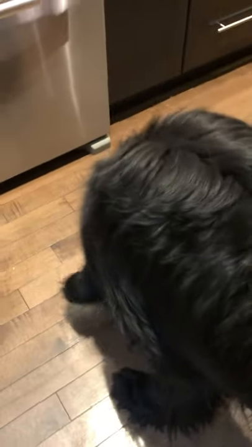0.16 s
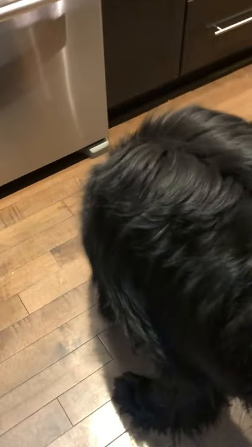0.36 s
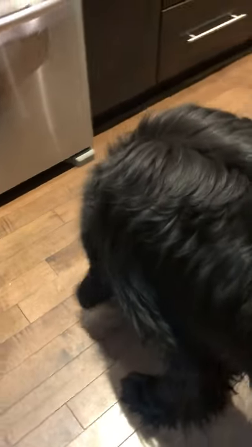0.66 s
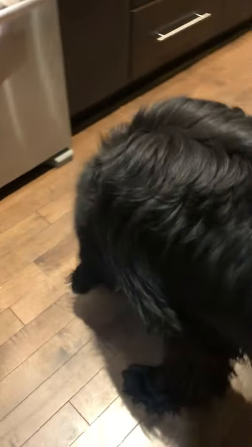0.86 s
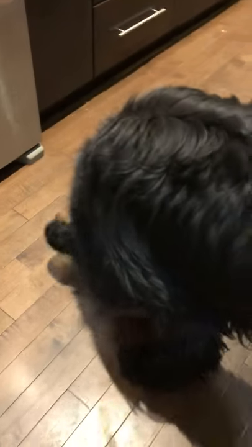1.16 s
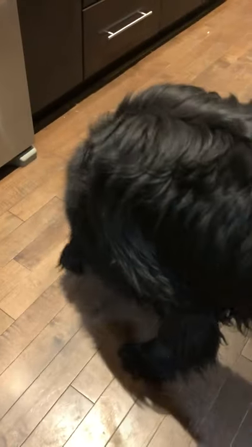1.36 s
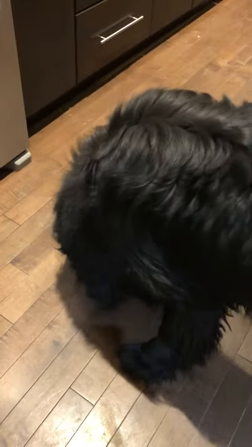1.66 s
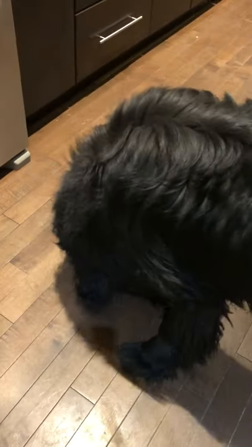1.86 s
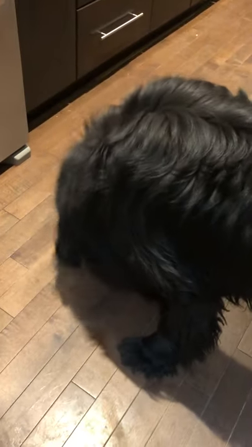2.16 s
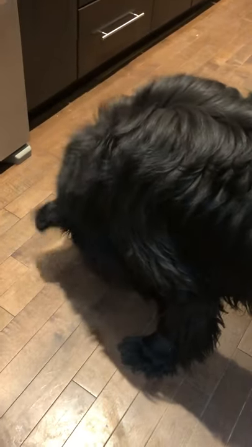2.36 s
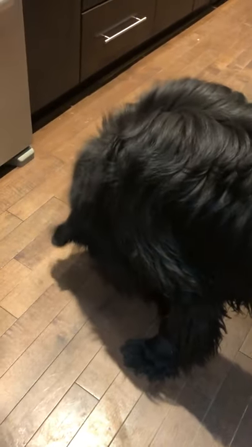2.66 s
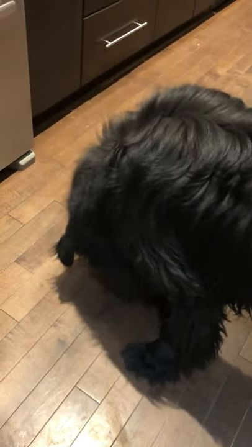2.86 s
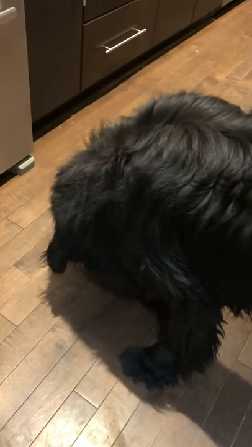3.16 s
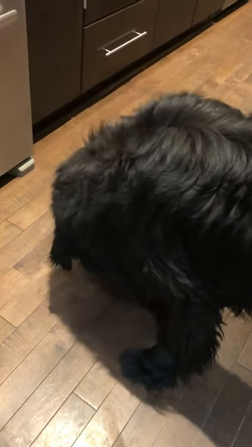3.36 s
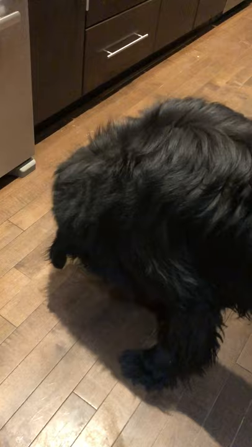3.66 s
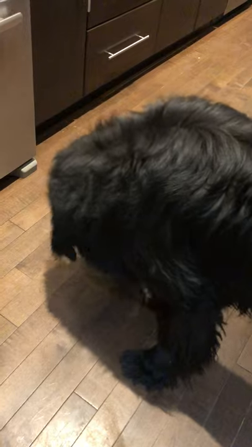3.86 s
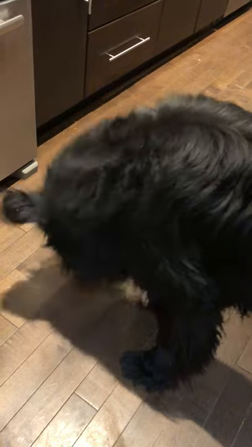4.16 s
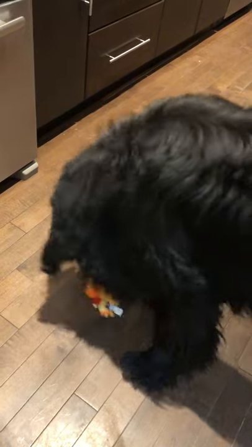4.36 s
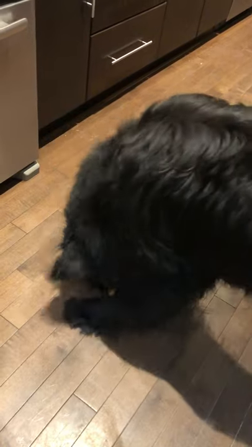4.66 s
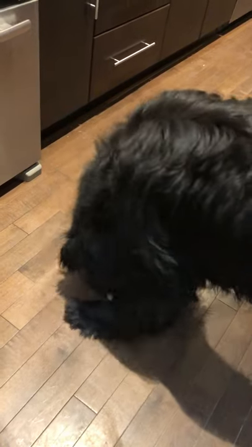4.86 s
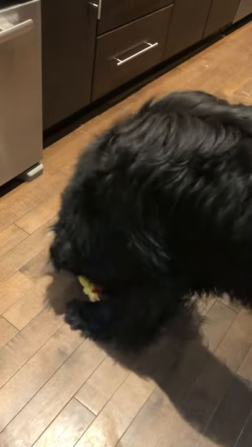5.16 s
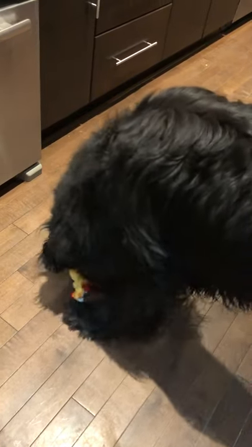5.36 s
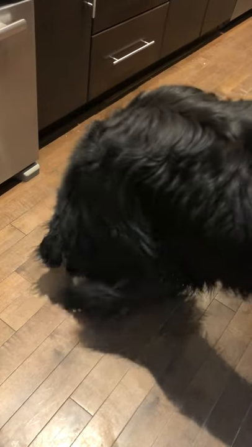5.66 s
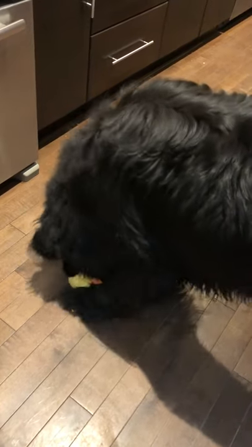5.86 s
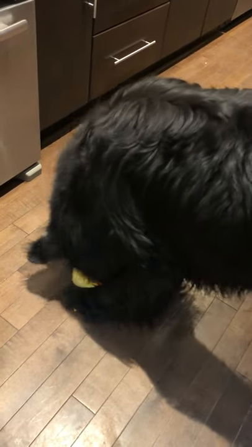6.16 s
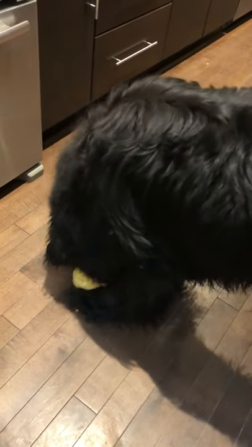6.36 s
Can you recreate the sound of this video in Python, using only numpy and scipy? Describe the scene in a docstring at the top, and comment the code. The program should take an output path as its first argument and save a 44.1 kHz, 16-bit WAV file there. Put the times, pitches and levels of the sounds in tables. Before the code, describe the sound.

A rubber toy squeaks with each bite and release as a dog mouths it and knocks it against a wooden kitchen floor.

```python
"""A hard, ringing kitchen with a wooden floor; a phone microphone near a large dog with a rubber toy.
Over the refrigerator's hum, paws thud and slide and the jaws smack. In the first seconds two bites
push air through the toy's reed, which sings again each time the jaws let go. Around four seconds
the toy knocks on the boards. Just after five comes a longer third bite with a hoarse, overblown
release, then a few last clacks and smacks."""
import sys
import numpy as np
from scipy import signal
from scipy.fft import rfft, irfft, next_fast_len
from scipy.io import wavfile
from scipy.ndimage import map_coordinates

SR = 44100
rng = np.random.default_rng(int(sys.argv[2]) if len(sys.argv) > 2 else 0)


def to_wav(sig):
    """Store sig (one row per channel, or 1-D mono) as 16-bit WAV at the path in sys.argv[1].

    Samples outside -1..1 are clipped; the rate is SR.
    """
    pcm = np.clip(np.atleast_2d(sig), -1, 1) * 32767
    pcm = np.round(pcm).astype(np.int16)
    wavfile.write(sys.argv[1], SR, pcm.T)  # frames by channels


N = 286633

# the kitchen's reverberation time: freq_hz, t60_s
ROOM_T60 = [(100, 0.12), (500, 0.97), (1400, 0.78), (5500, 0.64), (8000, 0.32), (15000, .28)]
# spectra of the reverberation, the steady room noise and the refrigerator's whine: freq_hz, gain_db
REVERB_TONE = [(100, 7.5), (600, 3.5), (1400, -2), (3000, 1), (6000, -2.5), (9000, 1), (15000, -0.5)]
RUMBLE_TONE = [(15, -48.5), (25, -26), (47, -2), (206, -3), (354, -11), (384, -13.5), (439, -8), (503, -12),
               (659, -14.5), (775, -17.5), (1130, -20), (2280, -28.5), (3250, -35), (3820, -32.5),
               (16000, -46)]
WHINE_TONE = [(2800, -45), (3130, -6), (3250, -7), (3370, -16), (3800, -44.5)]
# the refrigerator's hum: pitch_hz, level_db
FRIDGE_HUM = [(145.3, -69.5), (446.8, -69)]
# fur and rubber on the boards: start_s, attack_s, hold_s, level_db, tilt_db_per_octave, grain_db
SLIDES = [(0.0, .01, 0.045, -62, -3, 0.7), (.21, 0.0827, 0.014, -60.5, -0.5, 1.7),
          (.434, .008, 0.23, -58.5, -1.5, 1.9), (1.17, .07, 0.14, -58.5, 1, -0.4),
          (1.33, .08, .12, -53.5, 0.5, 1.25), (1.65, .02, 0.3, -64, -5, 2.5),
          (4.073, 0.0099, 0.033, -59, -0.5, 5.5), (4.22, .015, 0.013, -55, -4, 1.5),
          (4.335, .015, 0.12, -66, 0, 7), (4.47, 0.018, 0.075, -69.5, 1, 5),
          (4.95, .025, 0.07, -68, 1.5, 3.5)]
# smacks of the jaws: start_s, relative_level_db, mouth_resonance_hz
SMACKS = [(0.439, -45, 390), (.467, -46, 574), (0.485, -41.5, 318), (.505, -46, 498), (.525, -48, 526),
          (1.273, -42.5, 623), (1.288, -51, 343), (1.712, -48.5, 450), (1.734, -50, 380),
          (2.027, -40.5, 512), (2.046, -43.5, 344), (5.003, -35, 637), (5.012, -38.5, 340),
          (5.73, -32.5, 892), (5.781, -33.5, 522), (5.805, -39, 333), (5.886, -35.5, 338),
          (5.905, -36, 326)]
# soft blows on the floor: start_s, relative_level_db, pitch_ratio
THUDS = [(0.213, -46, 1), (1.299, -46, 0.9), (2.037, -46, 0.95), (3.886, -35, 1.15), (4.295, -39.5, 1),
         (4.645, -38.5, 1.15), (4.663, -31, .92), (5.783, -46, 0.95)]
# the floor's low modes: pitch_hz, gain_db, t60_s
FLOOR_MODES = [(72, -9, .33), (103, 3, 0.085), (140, -4.5, 0.095), (216, -7, 0.053), (330, -12, .08)]
# hard contacts of toy, teeth and claws: start_s, level_db, cutoff_hz, t60_s
CLACKS = [(3.882, -36.5, 3000, 0.023), (3.884, -34, 990, 0.032), (4.216, -54.5, 2000, 0.035),
          (4.277, -51.5, 5840, 0.023), (4.424, -61.5, 9000, 0.013), (4.478, -49.5, 4000, 0.033),
          (4.495, -40.5, 5000, .02), (4.6321, -17.5, 15000, 0.027), (4.64, -28, 15200, 0.013),
          (5.729, -27.5, 10890, .02), (5.732, -24.5, 4020, 0.015), (5.867, -43, 1400, 0.018),
          (6.214, -55.5, 1500, 0.023)]
# spectra of a slide, a clack and the tick of parting lips: freq_hz, gain_db
SLIDE_TONE = [(350, -51.5), (600, -16), (801, -13), (970, -11), (1160, -8.5), (2650, -9.5), (3830, -6.5),
              (15100, -20), (16000, -28)]
CLACK_TONE = [(100, -29.5), (600, -12), (1050, 1), (1600, -4), (2300, -1), (3400, 1.5), (5300, 1),
              (7000, -1), (10000, -7.5), (16000, -14)]
LIP_TONE = [(100, -4.5), (500, -2), (2000, -9), (4000, -33.5), (14000, -54.5)]
# the toy's resonances as the jaws shape it in each stroke of air: freq_hz, gain_db
BITE_1_TONE = [(1350, -10), (2700, -23.5), (4060, -16), (5410, -12), (6760, -0.5), (8110, -11.5),
               (9460, -20), (10820, -21.5), (12170, -28), (13520, -30), (14870, -32)]
RELEASE_1_TONE = [(1410, -1), (2820, -4.5), (4220, -6.5), (5630, 0.5), (7040, -3.5), (8450, -3.5),
                  (9860, -2.5), (11260, -7.5), (12670, -33.5), (14080, -11), (15490, -23.5)]
BITE_2_TONE = [(1330, -12.5), (2660, -22.5), (3990, -20), (5320, -11.5), (6640, -0.5), (7970, -4.5),
               (9300, -19.5), (10630, -19.5), (11960, -30.5), (13290, -23.5), (14620, -31.5)]
RELEASE_2_TONE = [(1250, 0.5), (2500, -5), (3760, -5.5), (5010, -2.5), (6260, -1.5), (7510, -1),
                  (8760, -5.5), (10020, -4), (11270, -2.5), (12520, -20), (13770, -15.5)]
BITE_3_TONE = [(1430, -4.5), (2860, -14.5), (4300, -8), (5730, 2), (7160, -8), (8590, -22.5),
               (10020, -23.5), (11460, -31), (12890, -33.5), (14320, -34.5), (15750, -46.5)]
RELEASE_3_TONE = [(1250, 0), (1500, 3.5), (1950, -3), (2350, -4.5), (2800, -9), (3800, -9), (4700, -2),
                  (5700, 4), (6400, -8), (7050, -4.5), (7900, -16.5), (9900, -9.5), (11300, -22),
                  (12800, -30), (15600, -30.5)]
# the first two bites and their releases, in turn: start_s, rise_s, fall_s, fall_exponent, crest_hz,
# climb_hz, crest_db, swell_db, jitter_ratio, rasp_db, reverb_db, tone_table
QUICK_STROKES = [ (0.597, .157, 0.047, 2.4, 1365, 56.2, -26.5, 6.1, 0.00023, -35, -4, BITE_1_TONE),
                 (0.813, .024, .145, 1.44, 1491, 205.5, -30.5, 6.5, 0.0013, -29, 1.5, RELEASE_1_TONE),
                 (1.842, .036, 0.056, 1.9, 1364, 65, -26, 4, 0.0004, -31.5, -1.5, BITE_2_TONE),
                 (2.039, .068, 0.054, 1.75, 1276, 69.5, -36, 5.54, 0.00067, -37.5, -1, RELEASE_2_TONE), ]
# the third bite and its overblown release follow the jaws: time_s, pitch_hz, level_db
BITE_3_PATH = [(5.164, 1246, -31.5), (5.176, 1318, -28), (5.24, 1438, -26.5), (5.258, 1422, -24.5),
               (5.272, 1405, -28.5), (5.292, 1421, -23.5), (5.386, 1504, -21.5), (5.416, 1454, -22),
               (5.436, 1424, -26), (5.456, 1286, -30.5)]
RELEASE_3_PATH = [(5.468, 1290, -33.5), (5.493, 1701, -23.5), (5.499, 2372, -25), (5.55, 2311, -27),
                  (5.573, 1876, -26.5), (5.583, 1512, -24), (5.613, 1444, -27), (5.628, 1324, -30.5),
                  (5.669, 1234, -36), (5.698, 1100, -51.5)]

TOP_HZ = 16000  # the microphone's band limit
SLIDE_T60_S, SLIDE_PIVOT_HZ = 0.2, 4000  # a slide's decay; the pivot of its spectral tilt
CLIMB_POWER = 1.7  # a quick stroke's pitch climbs fast at first, then levels off
CATCH_HZ, CATCH_S = 69, 0.0041  # the reed starts flat and catches within moments
SAG_HZ_PER_S, FADE_DB_PER_S = 2850, 111  # mean rates of sinking as the air runs out
OVERBLOW_HZ, OVERBLOW_DB = 1500, -8  # where the reed starts to strain; extra rasp at full strain


def amp(db):
    """Decibels to gain."""
    return 10 ** (np.asarray(db) / 20)


def unit(x):
    """x at rms 1."""
    return x / np.sqrt(np.mean(x ** 2) + 1e-20)


def along(points, hz):
    """(freq_hz, value) points read on a log frequency axis."""
    freqs, values = np.transpose(points)
    return np.interp(np.log(hz + 1), np.log(freqs + 1), values)


def wobble(rate, size):
    """A smooth random curve, rate knots a second."""
    knots = rng.standard_normal(int(size * rate / SR) + 4)
    return map_coordinates(knots, [np.arange(size) * rate / SR])


def filtered(x, response):
    """x through a gain that depends on frequency."""
    size = next_fast_len(len(x) + SR // 5)
    return irfft(rfft(x, size) * response(np.fft.rfftfreq(size, 1 / SR)), size)[:len(x)]


def noise(tone, size, cutoff_hz=np.inf):
    """Noise of rms 1 with the given spectrum, dulled above a cut-off."""
    white = rng.standard_normal(size)
    return unit(filtered(white, lambda hz: amp(along(tone, hz)) / np.sqrt(1 + (hz / cutoff_hz) ** 6)))


def add(track, start_s, x):
    """Mix x into the track from start_s."""
    part = track[round(start_s * SR):][:len(x)]
    part += x[:len(part)]


def in_room(x, reverb_db):
    """The direct sound at the microphone, then the kitchen's answer, a fresh random tail each time."""
    hz, t, spectrum = signal.stft(rng.standard_normal(SR), SR, nperseg=256)
    fade = amp(along(REVERB_TONE, hz)[:, None] - 60 * t / along(ROOM_T60, hz)[:, None])
    tail = signal.istft(spectrum * fade, SR, nperseg=256)[1]
    delay = np.arange(len(tail)) / SR
    # floor and cabinets answer first and strongest
    tail = tail * (1 - np.exp(-delay / 0.0012)) * (1 + 1.2 * np.exp(-delay / 0.032))
    response = amp(reverb_db) * tail / np.linalg.norm(tail)
    response[0] = 1
    return signal.fftconvolve(x, response)


def kitchen():
    """In the background the refrigerator hums and whines faintly over the room's rumble."""
    t = np.arange(N) / SR
    hum = sum(amp(db) * np.sqrt(2) * np.sin(2 * np.pi * hz * t + 0.25 * wobble(3.5, N))
              for hz, db in FRIDGE_HUM)
    return hum + amp(-59.5) * noise(RUMBLE_TONE, N) + amp(-81.5) * noise(WHINE_TONE, N)


def slides():
    """Fur and rubber drag over the wood: a grainy hiss that swells, holds and dies away."""
    out, t = np.zeros(N), np.arange(SR // 2) / SR
    for start_s, attack_s, hold_s, level_db, tilt, grain_db in SLIDES:
        tone = [(hz, db + tilt * np.log2(hz / SLIDE_PIVOT_HZ)) for hz, db in SLIDE_TONE]
        hiss = unit(noise(tone, len(t)) * amp(grain_db * wobble(220, len(t))))
        decay = amp(-60 * np.maximum(t - attack_s - hold_s, 0) / SLIDE_T60_S)
        add(out, start_s, amp(level_db) * np.clip(t / attack_s, 0, 1) * decay * hiss)
    return in_room(out, reverb_db=-6.5)[:N]


def jaw_smacks():
    """Lips part with a soft tick, and the mouth's cavity rings for a few cycles."""
    out, t = np.zeros(N), np.arange(SR // 10) / SR
    attack = 1 - np.exp(-t / 0.00088)
    for start_s, db, mouth_hz in SMACKS:
        pop = np.sin(2 * np.pi * mouth_hz * t) * amp(-60 * t / 0.04)
        tick = noise(LIP_TONE, len(t)) * amp(-7 - 60 * t / 0.025)
        add(out, start_s, in_room(amp(db + 3.5) * (pop + tick) * attack, reverb_db=-8))
    return out


def floor_thuds():
    """Paws and toy set the low modes of the floor ringing."""
    out, t = np.zeros(N), np.arange(SR // 2) / SR
    attack = 1 - np.exp(-t / 0.003)
    for start_s, db, pitch_ratio in THUDS:
        for hz, mode_db, t60_s in FLOOR_MODES:
            decay = amp(mode_db + rng.normal(0, 3.3) - 60 * t / t60_s)
            ring = np.sin(2 * np.pi * hz * pitch_ratio * t + rng.uniform(0, 2 * np.pi))
            add(out, start_s, amp(db + 1.5) * attack * decay * ring)
    return in_room(out, reverb_db=-5)[:N]


def clacks():
    """Toy, teeth and claws make short cracks, duller where rubber meets wood."""
    out, t = np.zeros(N), np.arange(SR // 10) / SR
    for start_s, level_db, cutoff_hz, t60_s in CLACKS:
        crack = noise(CLACK_TONE, len(t), cutoff_hz) * amp(level_db - 60 * t / t60_s)
        add(out, start_s, in_room(crack, reverb_db=-5.5))
    return out


def stroke_path(start_s, rise_s, fall_s, fall_exponent, crest_hz, climb_hz, crest_db, swell_db):
    """Rows of time_s, pitch_hz, level_db: pitch and level build with the pressure and sink with it."""
    t = np.arange(0, rise_s + fall_s, 1 / SR)
    rise_left = np.clip(1 - t / rise_s, 0, 1)
    spent_s = fall_s * np.clip((t - rise_s) / fall_s, 0, 1) ** fall_exponent
    flat_hz = CATCH_HZ * np.exp(-t / CATCH_S)
    pitch_hz = crest_hz - climb_hz * rise_left ** CLIMB_POWER - flat_hz - SAG_HZ_PER_S * spent_s
    level_db = crest_db - swell_db * rise_left - FADE_DB_PER_S * spent_s
    return np.column_stack([start_s + t, pitch_hz, level_db])


def reed(path, tone, jitter, rasp_db):
    """One stroke of air: the reed's harmonics glide through the resonances of the rubber body."""
    time_s, pitch_hz, level_db = np.transpose(path)
    t = np.arange(time_s[0], time_s[-1], 1 / SR)
    glide_hz = np.interp(t, time_s, pitch_hz)
    # blown far above its normal pitch, the reed turns hoarse
    strain = np.clip(3 * (glide_hz / OVERBLOW_HZ - 1), 0, 1)
    # while the pressure collapses the pitch sags and the reed beats unevenly
    sag = np.clip(-np.gradient(glide_hz, t) / 3000, 0, 1)
    waver = 0.0031 * wobble(70, len(t))
    roughness = jitter * (1 + strain + sag) * wobble(900, len(t))
    reed_hz = glide_hz * (1 + waver + roughness)
    phase = 2 * np.pi * np.cumsum(reed_hz) / SR
    harmonic = np.arange(1, 15)[:, None]
    # a strained reed swings freely to both sides, which weakens its even harmonics
    even_loss_db = 5.2 * strain * (harmonic % 2 == 0)
    gains = amp(along(tone, harmonic * reed_hz) - even_loss_db) * (harmonic * reed_hz < TOP_HZ)
    song = np.sum(gains * np.sin(harmonic * phase), axis=0) / np.sqrt(np.sum(gains ** 2, axis=0) / 2)
    # air rushes through the slit once a cycle and takes the body's colour
    puffs = rng.standard_normal(len(t)) * (1 + np.cos(phase))
    body_tone = [(800, -50)] + list(tone)
    breath = unit(filtered(puffs, lambda hz: amp(along(body_tone, hz))))
    rasp = (amp(rasp_db) + strain * amp(OVERBLOW_DB)) * breath
    edge_fade = np.clip(np.minimum(t - time_s[0], time_s[-1] - t) / 0.0047, 0, 1)
    return amp(np.interp(t, time_s, level_db)) * edge_fade * (song + rasp)


def toy_squeaks():
    """The toy, near the microphone: bites blow the reed cleanly; air drawn back in makes it rougher."""
    out = np.zeros(N)
    for start_s, *shape, jitter, rasp_db, reverb_db, tone in QUICK_STROKES:
        squeak = reed(stroke_path(start_s, *shape), tone, jitter, rasp_db)
        add(out, start_s, in_room(squeak, reverb_db))
    bite = reed(BITE_3_PATH, BITE_3_TONE, jitter=0.000453, rasp_db=-45)
    add(out, BITE_3_PATH[0][0], in_room(bite, reverb_db=-6.5))
    release = reed(RELEASE_3_PATH, RELEASE_3_TONE, jitter=0.006, rasp_db=-25)
    add(out, RELEASE_3_PATH[0][0], in_room(release, reverb_db=-5))
    return out


def scene():
    """Kitchen, dog and toy at one microphone, in mono."""
    return (kitchen() + slides() + jaw_smacks() + floor_thuds() + clacks() + toy_squeaks())[None]


def record(dry):
    """The phone's microphone rolls off below 42 Hz and keeps nothing above its band limit."""
    response = lambda hz: (hz < TOP_HZ) * hz ** 3 / np.sqrt(hz ** 6 + 42 ** 6)
    return np.array([filtered(channel, response) for channel in dry])


dry = scene()
out = record(dry)
to_wav(out)
```